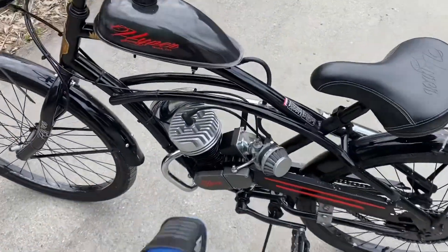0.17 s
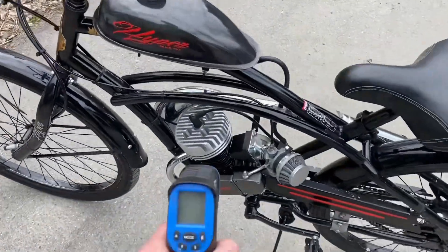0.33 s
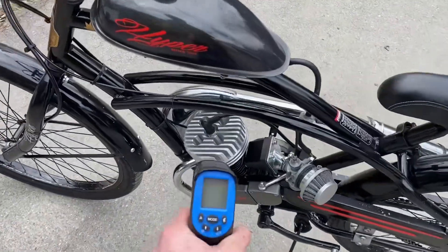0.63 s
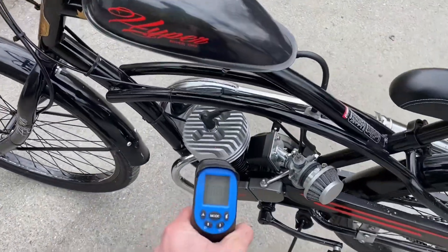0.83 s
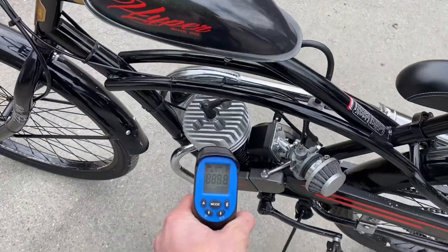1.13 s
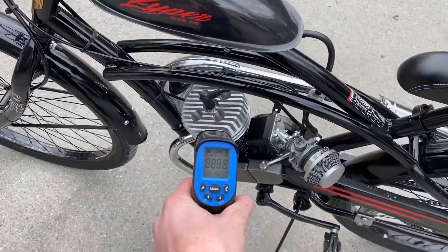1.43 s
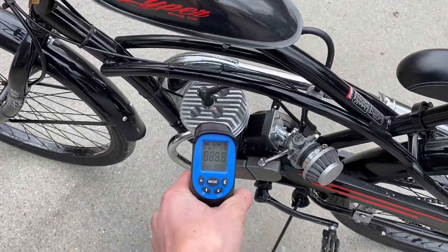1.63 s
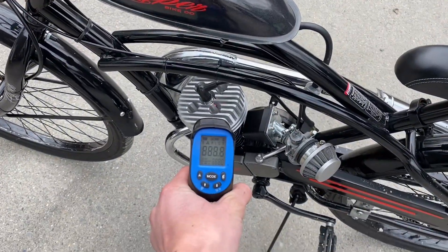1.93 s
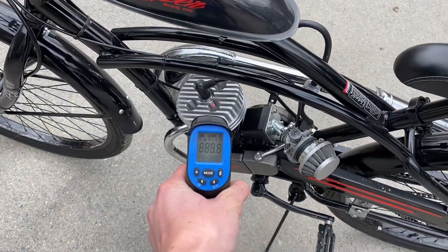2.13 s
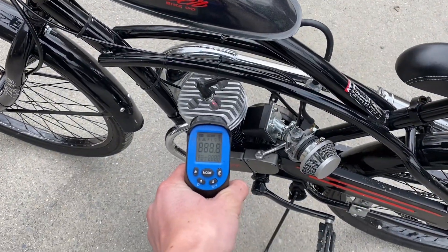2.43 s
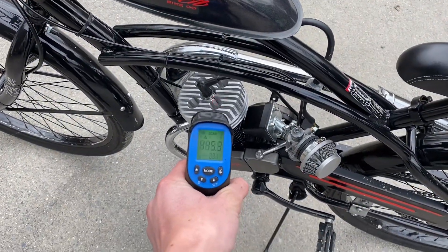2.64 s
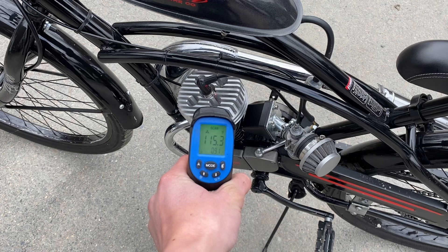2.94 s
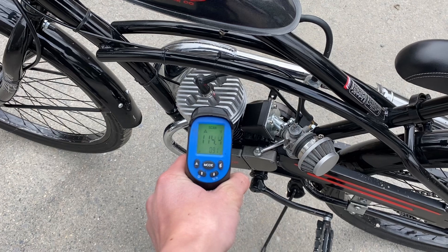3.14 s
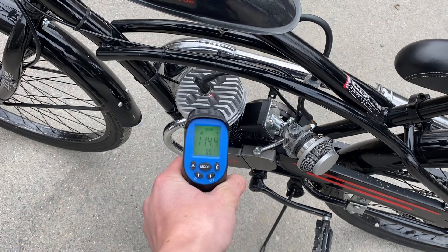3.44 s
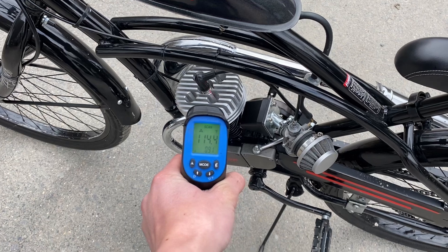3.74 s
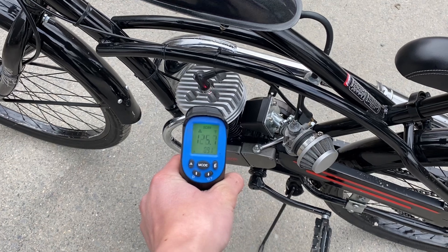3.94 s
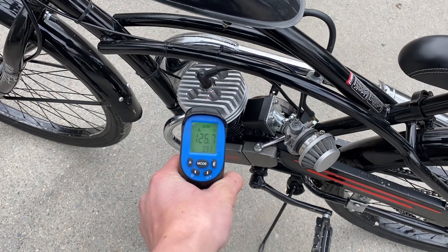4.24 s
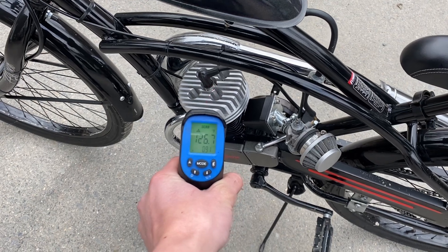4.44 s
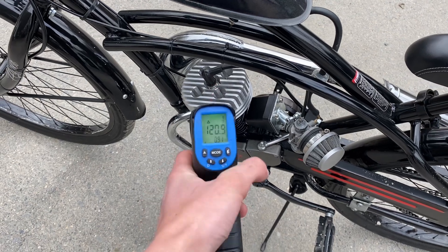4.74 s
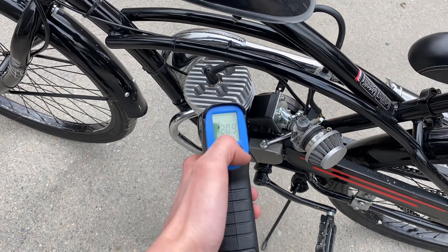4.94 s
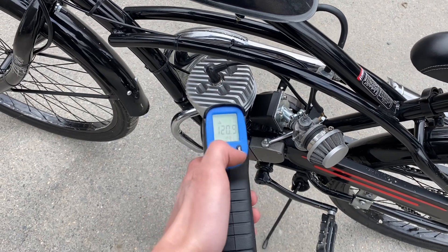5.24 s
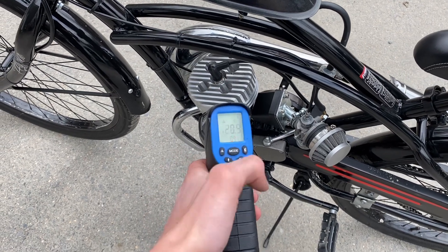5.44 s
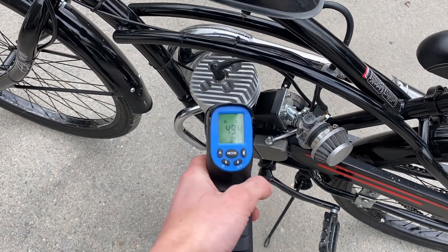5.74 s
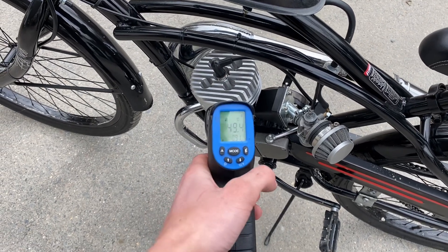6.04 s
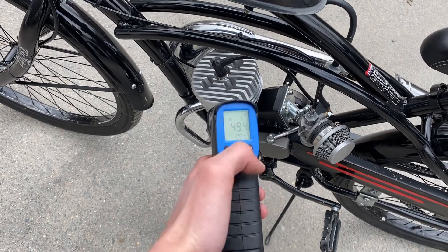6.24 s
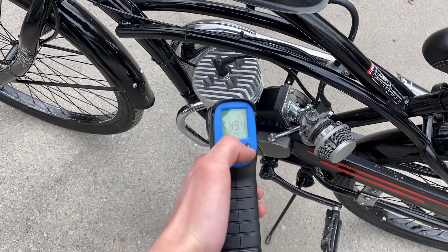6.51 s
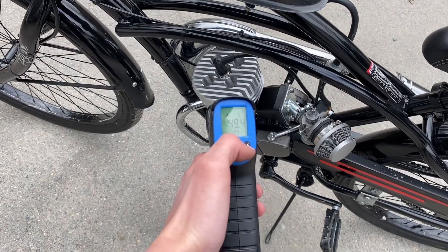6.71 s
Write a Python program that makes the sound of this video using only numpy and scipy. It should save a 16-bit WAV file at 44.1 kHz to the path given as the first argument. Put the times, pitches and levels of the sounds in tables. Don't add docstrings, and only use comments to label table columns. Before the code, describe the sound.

From 0 to nearly 7 seconds a small two-stroke bicycle engine idles continuously, about a metre from a hand-held stereo microphone outdoors on paving. The crank turns about 52 times a second, making a fast fluttering, airy pulse with dry metallic ticking. Over it, loud exhaust barks come unevenly every 0.11 to 0.15 seconds: short, hollow, ringing pops, strongest in the middle range, each with a bright rattle of head and cooling fins. Many have a weaker pop just before; some trail off over one to three turns, others stop cleanly. The first half second is slightly softer, then by 1 second the sound is a little nearer and stays steady. Bangs vary in force, softer around 3.1 seconds, strong near 2.6 and 5.8. Very short reflections and a barely audible low street rumble surround it. The engine is still running when the sound ends.

```python
import sys
import numpy as np
from scipy import signal
from scipy.fft import rfft, irfft
from scipy.io import wavfile
from scipy.ndimage import uniform_filter1d

SR = 44100
rng = np.random.default_rng(int(sys.argv[2]) if len(sys.argv) > 2 else 0)


def int16_out(signal):
    q = np.round(np.clip(np.atleast_2d(signal).T, -1, 1) * 32767)
    wavfile.write(sys.argv[1], SR, q.astype(np.int16))


def ratio(d):
    e = np.asarray(d, float) / 20
    return 10 ** e


N = 302967

TURN_S = 0.01905
FULL_BARK_DB = -16


def firings():
    # port opening in seconds, bark in dB, turn before in dB.
    catches = [(0.1566, -15.5, -21), (1.275, -13, -14.5), (1.5367, -15, -14.5), (1.799, -12, -16),
               (1.913, -12.5, -18), (2.3252, -13.5, -14.5), (2.458, -12, -15.5), (2.7275, -12, -16.5),
               (2.8657, -13.5, -14.5), (2.9855, -14.5, -16.5), (3.469, -12.5, -16), (3.5861, -12.5, -17),
               (3.986, -11, -19.5), (4.0998, -11.5, -18), (4.2322, -14, -13), (4.6294, -12, -15.5),
               (5.0056, -11, -16.5), (5.137, -12, -17), (5.2709, -13, -18), (5.9405, -12.5, -18.5),
               (6.1945, -12, -16.5), (6.3118, -12, -16), (6.5614, -12, -18), (6.7924, -11, -35)]
    # port opening in seconds, bark in dB, turn before in dB, turn after in dB.
    builds = [
        (0.3282, -14, -14, -20),
        (0.745, -12, -16.5, -33),
        (3.0836, -18.5, -16.5, -19.5),
        (3.3357, -12.5, -15, -35),
        (4.4967, -14, -15, -32),
        (5.5398, -14.5, -13.5, -33),
        (5.6724, -12, -16.5, -37),
    ]
    # port opening in seconds, bark in dB, turn before in dB, turn after in dB.
    swells = [(0.1946, -15.5, -24, -18.5), (0.4609, -11.5, -17, -17.5), (.612, -13, -15, -19),
              (.878, -13, -16.5, -15.5), (1.1423, -14, -18.5, -16.5), (1.4054, -13.5, -16.5, -19),
              (2.5924, -10.5, -35, -17), (3.2002, -14, -16, -19.5), (3.7204, -12.5, -17, -23),
              (4.7437, -12, -23, -17), (4.875, -12.5, -19.5, -23), (6.0586, -12.5, -18.5, -18.5),
              (6.4469, -14.5, -13, -19.5), (6.6762, -12.5, -16.5, -19.5)]
    # port opening in seconds, bark in dB, turn before in dB, turn after in dB.
    fades = [
        (0.0418, -12.5, -19, -17),
        (1.0112, -14.5, -16.5, -16),
        (1.6498, -11.5, -31.5, -16.5),
        (2.0268, -12.5, -31, -15.5),
        (2.1749, -13.5, -18.5, -17.5),
        (3.836, -12.5, -26, -16),
        (4.345, -11.5, -24, -20),
        (5.3859, -13, -19.5, -19),
        (5.7877, -11, -27, -18),
    ]
    lead_turn_s, trail_turn_s = 0.0194, 0.0186
    build_db, fade_db = -2.5, (-2, -12.5)
    bangs = catches + builds + swells + fades
    rows = [(s, db) for s, db, *_ in bangs]
    rows += [(s - lead_turn_s, before) for s, _, before, *_ in bangs]
    rows += [(s - 2 * lead_turn_s, before + build_db) for s, _, before, _ in builds]
    burning = len(rows)
    rows += [(s + trail_turn_s, after) for s, _, _, after in builds + swells + fades]
    for s, _, _, after in fades:
        rows += [(s + (k + 2) * TURN_S, after + db) for k, db in enumerate(fade_db)]
    s, bark_db = np.transpose(rows)
    rattle_db = -27.5 + 1.71 * (bark_db - FULL_BARK_DB)
    rattle_db = rattle_db + 0.96 * rng.standard_normal(len(s))
    rattle_db[burning:] -= 1.5
    rattle_db = np.minimum(rattle_db, -20.5)
    return np.array([s, bark_db, rattle_db])[:, np.argsort(s)]


def crank():
    sag = 0.006
    s, bark_db, rattle_db = firings()
    lit = np.concatenate([[0], np.cumsum(np.round(np.diff(s) / TURN_S))]).astype(int) + 2
    turn = np.arange(lit[-1] + 6)
    anchor = np.array([0, *lit, turn[-1]])
    first_s = s[0] - lit[0] * TURN_S
    last_s = s[-1] + (turn[-1] - lit[-1]) * TURN_S
    times = np.interp(turn, anchor, [first_s, *s, last_s])
    after = np.searchsorted(anchor, turn)
    since = turn - anchor[np.maximum(after - 1, 0)]
    times -= sag * TURN_S * since * (anchor[after] - turn)
    bark = ratio(-33.5 + 0.5 * rng.standard_normal(len(turn)))
    rattle = np.zeros(len(turn))
    bark[lit], rattle[lit] = ratio(bark_db), ratio(rattle_db)
    return times, bark, rattle


def exhaust(times, bark):
    # frequency in Hz, level in dB re bark, T60 in seconds.
    pipe = [(674, -6, 0.022), (770, -4, 0.055), (852, 1, 0.105), (1540, -10, 0.07), (1195, -16.5, 0.21),
            (1370, -3, 0.034), (1681, -9, 0.054), (2517, -4, 0.015), (3288, -4, 0.02), (4107, -8, 0.018),
            (4465, -20, 0.035)]
    chance = rng.standard_normal((len(times), 2 * len(pipe))).T
    out = 0
    for k, (hz, db, t60) in enumerate(pipe):
        slip = 0.00011 * k + 0.1 * chance[-1 - k] / hz
        blasts = spikes(times + slip, bark * ratio(db + 1.05 * chance[k]))
        out = out + ring_one_turn(blasts, hz, t60)
    return 1.077 * out


def breathing(times, bark):
    # delay after port opening in ms, width in ms, level in dB, sign.
    pumping = [
        (5.5, 6.2, -17.5, -1),
        (7.55, 1.0, -18.5, 1),
        (11, .7, -30, 1),
        (15.8, 1.2, -22, 1),
    ]
    # delay after port opening in ms, width in ms, level in dB re bark, sign.
    puff = [
        (3.8, .8, -9, 1),
        (5.5, 6.2, -3, -1),
        (8, 1.2, -9, 1),
        (11.2, .85, -2, 1),
        (14.8, 1.3, -7, -1),
    ]
    # frequency in Hz, T60 in seconds, level in dB, share of bark (ratio).
    intake = (411, .11, -22.5, .5)
    # frequency in Hz, T60 in seconds, level in dB.
    frame = (201, 1, -46)
    wobble = ratio(1.0 * rng.standard_normal((len(times), 2))).T
    cold = np.clip(1 - (bark / ratio(FULL_BARK_DB)) ** 2, 0, 1)
    bark = bark * np.sqrt(1 - cold)
    hz, t60, db, share = intake
    kick_s = times - 0.0003 + 0.0038 * (cold > 0.5)
    kicks = spikes(kick_s, np.maximum(ratio(db) * wobble[0], share * bark))
    frame_hz, frame_t60, frame_db = frame
    hum = ring(spikes(times, ratio(frame_db)), frame_hz, frame_t60)
    rocking = ring(spikes(times + 0.0105, bark * ratio(-18)), 63, 0.3)
    cold_air = humps(times, ratio(1) * cold * wobble[1], pumping)
    hot_air = humps(times, ratio(0.5) * bark, puff)
    return cold_air - ring_one_turn(kicks, hz, t60) + hum - rocking + hot_air


def head(times, rattle):
    # frequency in Hz, level in dB per Hz.
    knock_colour = [(500, -2.5), (1500, -0.5), (3200, 1), (5000, -2), (7000, -7), (10000, -6), (13000, -8),
                    (16500, -17.5)]
    # frequency in Hz, level in dB per Hz.
    clatter_colour = [(450, -1), (700, -5), (1300, -6.5), (2200, -12.5), (3300, -10), (5000, -16),
                      (12000, -21), (16500, -29)]
    likeness = 0.66
    burn = swell(times + 0.00045, rattle, 2.06, 8.6)
    burn += 0.5 * swell(times - 0.006, rattle, 0.29, 7.7)
    burn += 0.43 * swell(times + 0.00069, rattle, 0.15, 0.94)
    rough = pair(likeness) * ratio(1.96 * flicker(700))
    knock = level(fins(colour(rough, knock_colour)), 3.6) * burn
    effort = ratio(1.5 * rng.standard_normal(len(times)))
    busy = 1 + 0.85 * swell(times - 0.006, effort, 2.8, 9.0)
    ticks = pair(likeness) * ratio(1.51 * rng.exponential(size=N))
    return knock + level(fins(colour(busy * ticks, clatter_colour)), -25)


def fins(x):
    # frequency in Hz, width in Hz, level in dB over the broad rattle, left minus right in dB.
    modes = [(1237, 40, -2, -8.5), (1460, 59, -16.5, -3), (1685, 89, 4, -1.5), (2797, 14, 4, 0),
             (3116, 20, -12, -4), (3485, 39, -2.5, -11.5), (3760, 14, 0, -8), (4550, 240, -3, -1),
             (5395, 41, -1, 14), (5626, 30, -1.5, 24), (6310, 87, 3.5, 0), (6870, 50, 6.5, 1),
             (7910, 76, 2, -4)]
    lean = np.array([[0.5], [-0.5]])
    total = x
    for hz, width, db, pan_db in modes:
        struck = x * ratio(3 * flicker(60))
        peak = signal.lfilter(*signal.iirpeak(hz, hz / width, SR), struck)
        total = total + ratio(db + pan_db * lean) * peak
    return signal.sosfilt(signal.butter(4, 230, "high", fs=SR, output="sos"), total)


def ring_one_turn(x, hz, t60):
    age = np.arange(int(1.1 * TURN_S * SR)) / SR
    fade = np.clip((age[-1] - age) / 0.004, 0, 1) * np.clip(0.3 + age / 0.002, 0, 1)
    wave = np.sin(2 * np.pi * hz * age) * ratio(-60 * age / t60) * fade
    return signal.fftconvolve(x, wave)[:N]


def ring(x, hz, t60):
    r, w = np.exp(-np.log(1000) / (t60 * SR)), 2 * np.pi * hz / SR
    return signal.lfilter([0, np.sin(w)], [1, -2 * r * np.cos(w), r * r], x)


def spikes(times, sizes):
    at = np.round(times * SR).astype(int)
    inside = (at >= 0) & (at < N)
    return np.bincount(at[inside], (sizes + 0 * times)[inside], N)


def humps(times, sizes, shape):
    ms = np.arange(-SR // 40, SR // 40) / SR * 1000
    wave = sum(sign * ratio(db) * np.exp(-0.5 * ((ms - at) / width) ** 2) for at, width, db, sign in shape)
    return signal.fftconvolve(spikes(times, sizes), wave, "same")


def swell(times, sizes, rise_ms, fall_ms):
    ms = np.arange(-SR // 40, SR // 40) / SR * 1000
    rise = np.exp(np.minimum(ms, 0) / rise_ms)
    fall = np.exp(-np.maximum(ms, 0) / fall_ms)
    return signal.fftconvolve(spikes(times, sizes), np.where(ms < 0, rise, fall), "same")


def pair(likeness):
    mid, side = rng.standard_normal((2, N))
    likeness = np.clip(likeness, 0, 1)
    return np.sqrt(1 + likeness) * mid + np.sqrt(1 - likeness) * side * np.array([[1], [-1]])


def flicker(rate):
    hold = int(SR / rate)
    steps = np.repeat(rng.standard_normal(N // hold + 1), hold)
    return 1.07 * uniform_filter1d(steps, hold)[:N]


def level(x, db):
    return x * ratio(db) / np.sqrt(np.mean(x ** 2))


def colour(x, points):
    hz = np.maximum(np.fft.rfftfreq(x.shape[-1], 1 / SR), 1)
    f, db = np.transpose(points)
    return irfft(rfft(x) * ratio(np.interp(np.log(hz), np.log(f), db)), x.shape[-1])


def approach():
    # time in seconds, level in dB.
    near = [(0, -1.5), (0.499, -2), (1, -0.5), (3, -0.5), (5, -0.5), (6.87, -0.5)]
    return ratio(np.interp(np.arange(N) / SR, *np.transpose(near)))


def yard(engine):
    # frequency in Hz, level in dB.
    tail_colour = [(300, -30), (700, -10), (1500, 0), (4000, -2), (7000, -14), (16000, -24)]
    t60_s, tail_db = 0.08, -13
    age = np.arange(SR // 5) / SR
    tail = colour(rng.standard_normal((2, len(age))), tail_colour) * ratio(-60 * age / t60_s)
    tail = tail * ratio(tail_db) / np.sqrt(np.mean(np.sum(tail ** 2, axis=1)))
    return signal.fftconvolve(engine, tail, axes=1)[:, :N]


def street():
    # frequency in Hz, level in dB per Hz.
    rumble = [(30, -20), (60, 0), (200, -4), (600, -14), (3000, -30)]
    return level(colour(pair(0.9), rumble), -46)


def scene():
    times, bark, rattle = crank()
    engine = exhaust(times, bark) + breathing(times, bark) + head(times, rattle)
    engine = engine * approach()
    return engine + yard(engine) + street()


def ports(dry):
    # frequency in Hz, left minus right in dB.
    balance = [(60, 3), (200, 1.5), (380, 2.5), (800, -2.0), (1290, 1.5), (2380, 3.0), (4400, 2.0),
               (15000, 0.0)]
    # frequency in Hz, lead of the left in radians.
    phase = [(0, 0), (1720, -0.5), (3530, 0.7), (5340, 0.6), (5600, 0.1), (7490, 0)]
    hz = np.fft.rfftfreq(N, 1 / SR) + 1
    f, db = np.transpose(balance)
    lean = np.interp(np.log(hz), np.log(f), db)
    flips = sum(np.clip((hz - 7890 - k * 2090) / 880 + 0.5, 0, 1) for k in range(4))
    half = ratio(lean / 2) * np.exp(0.5j * (np.interp(hz, *np.transpose(phase)) - np.pi * flips))
    band = (hz < 16000) / np.sqrt(1 + (45.3 / hz) ** 18)
    left, right = rfft(dry) * np.array([half, 1 / half]) * band
    return hz, left, right


def gaps(hz, table, width):
    return ratio(sum(db * np.exp(-((hz - mid) / (width * half)) ** 8) for mid, half, db in table))


def sum_and_difference(dry, hz, left, right):
    # frequency in Hz, half width in Hz, level in dB.
    sum_gaps = [(560, 70, -6), (8980, 440, -70), (13180, 520, -70)]
    # frequency in Hz, half width in Hz, level in dB.
    difference_gaps = [(6930, 520, -70), (11070, 560, -70), (15500, 1000, -70)]
    versions = []
    for width in (1.3, 0.8, 0.02):
        both = (left + right) * gaps(hz, sum_gaps, width)
        apart = (left - right) * gaps(hz, difference_gaps, width)
        versions.append(irfft(np.array([both, apart]) / 2, N))
    wide, narrow, shut = versions
    power = uniform_filter1d(dry[0] ** 2, SR // 43)
    need = power / power.mean() + 0.5 * flicker(20)
    some, much = (uniform_filter1d(1.0 * (need > edge), SR // 100) for edge in (1.1, 2.5))
    mid, side = wide + some * (narrow - wide) + much * (shut - narrow)
    return np.array([mid + side, mid - side])


def band_limit(x):
    return signal.sosfilt(signal.butter(12, 16820, fs=SR, output="sos"), x)


def record(dry):
    dry = np.tanh(0.94 * dry) / 0.96
    hz, left, right = ports(dry)
    mix = sum_and_difference(dry, hz, left, right)
    return band_limit(mix)


dry = scene()
out = record(dry)
int16_out(out)
```